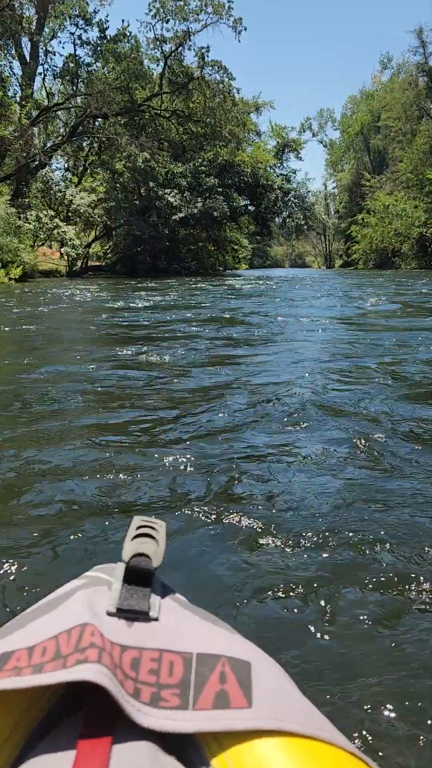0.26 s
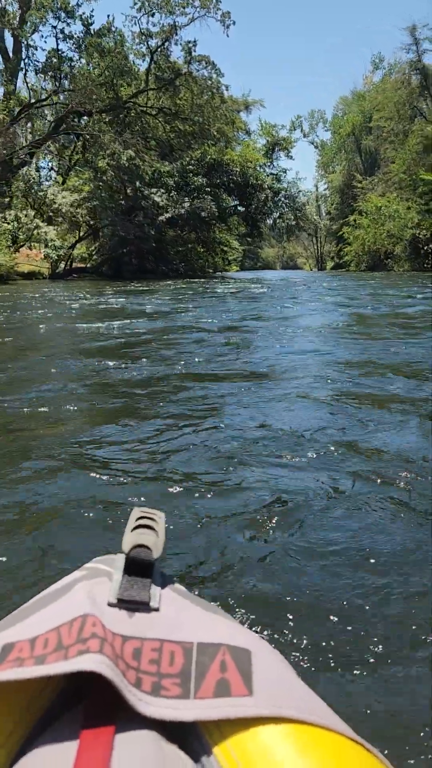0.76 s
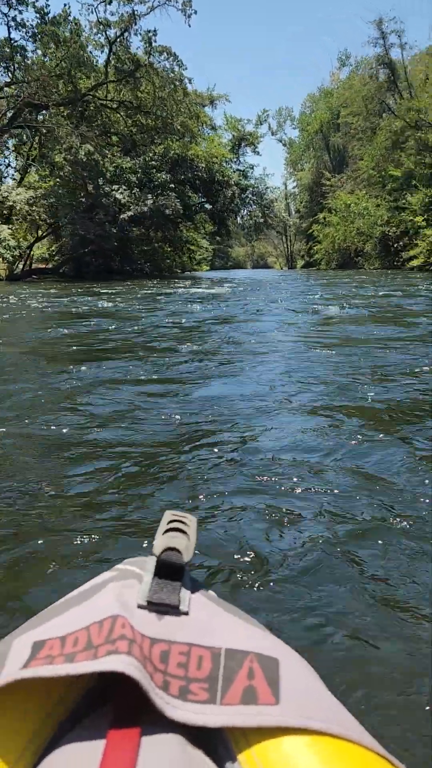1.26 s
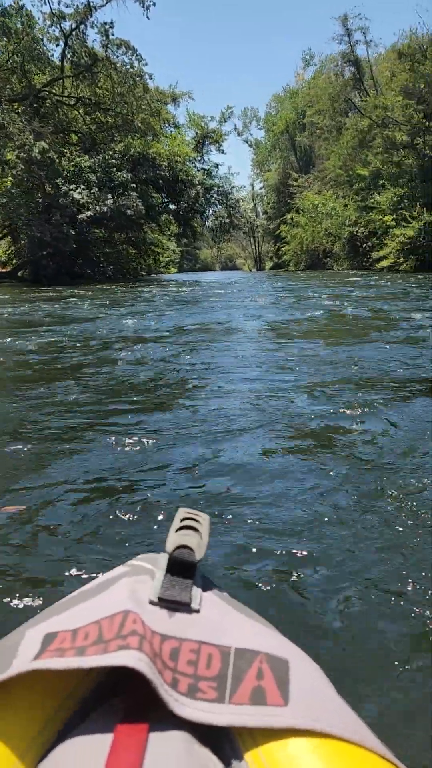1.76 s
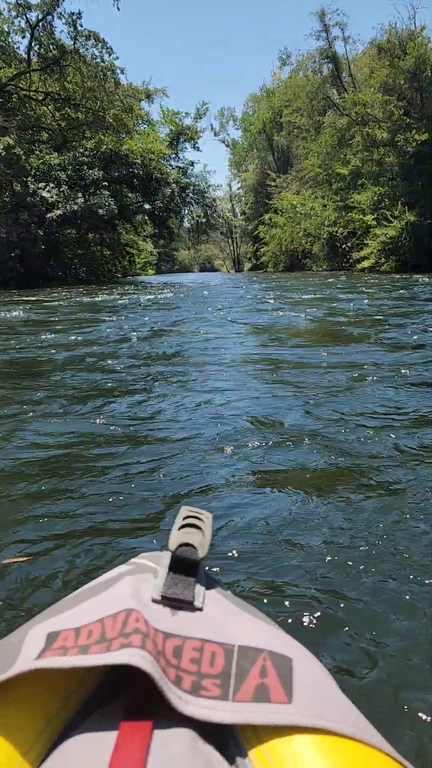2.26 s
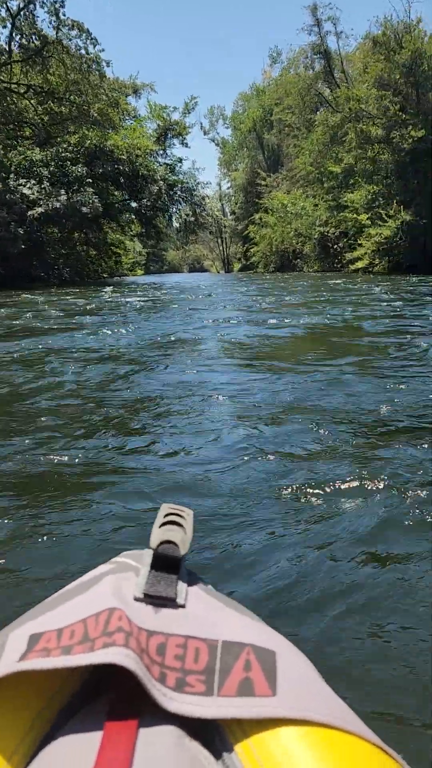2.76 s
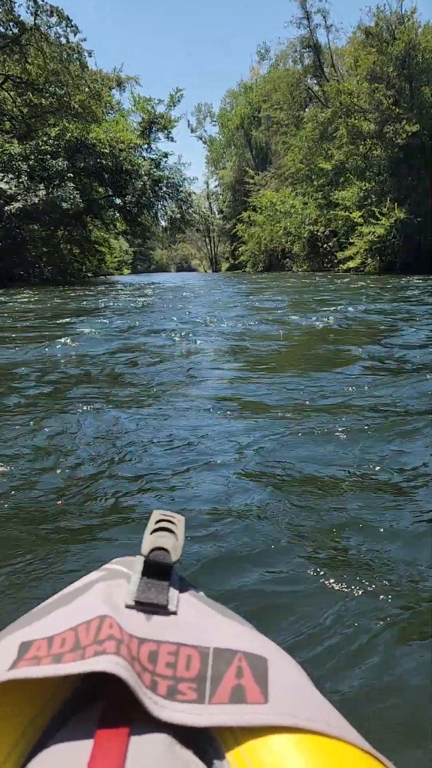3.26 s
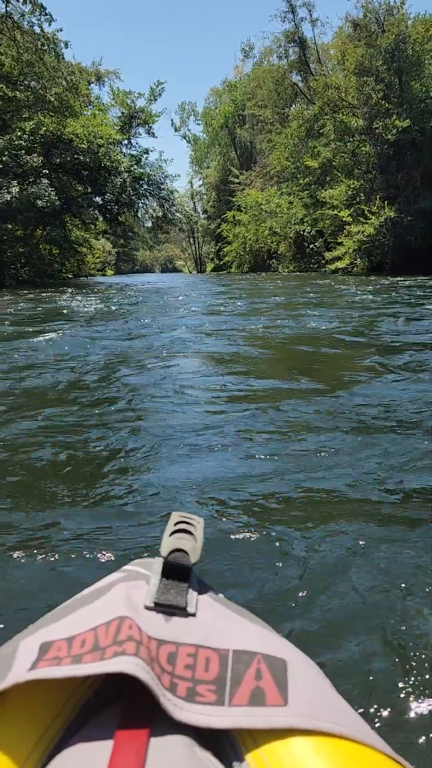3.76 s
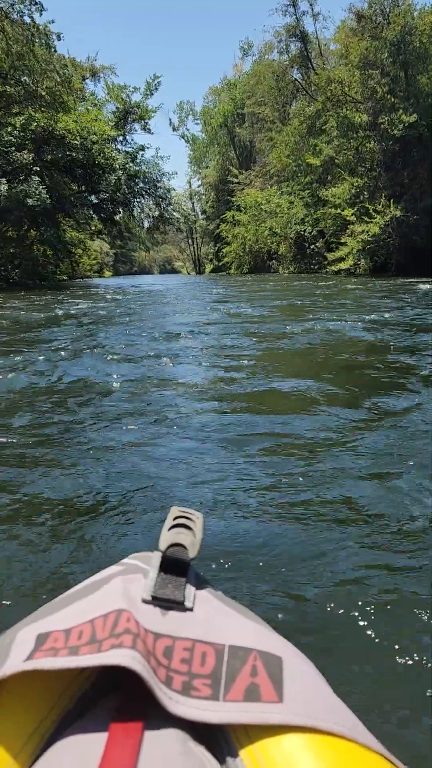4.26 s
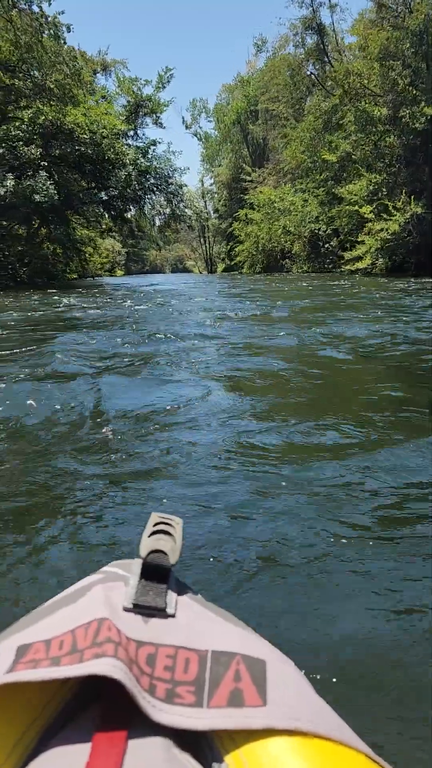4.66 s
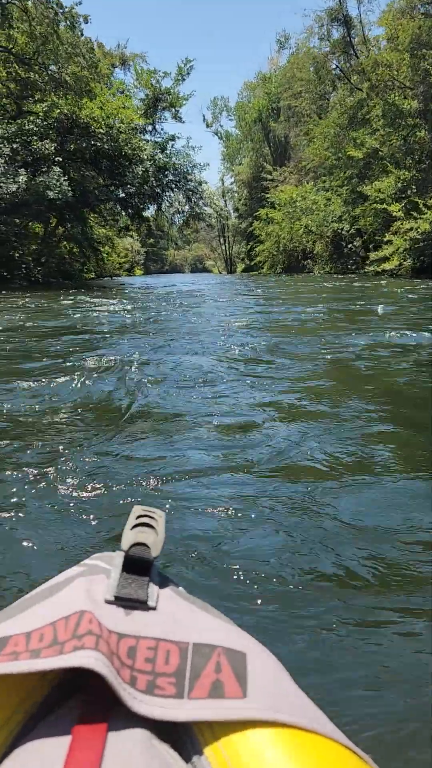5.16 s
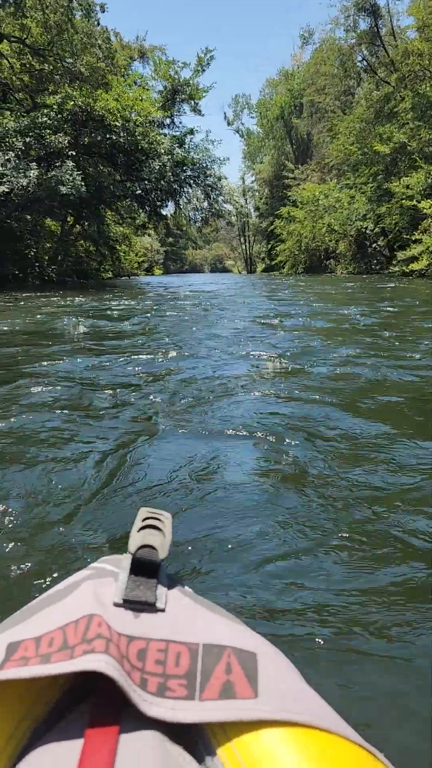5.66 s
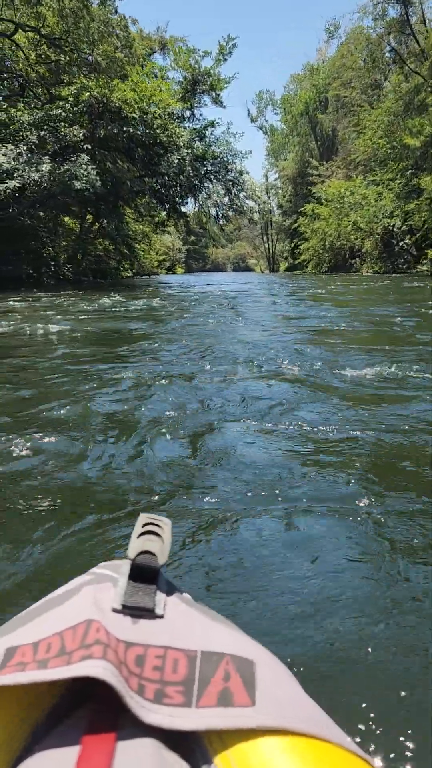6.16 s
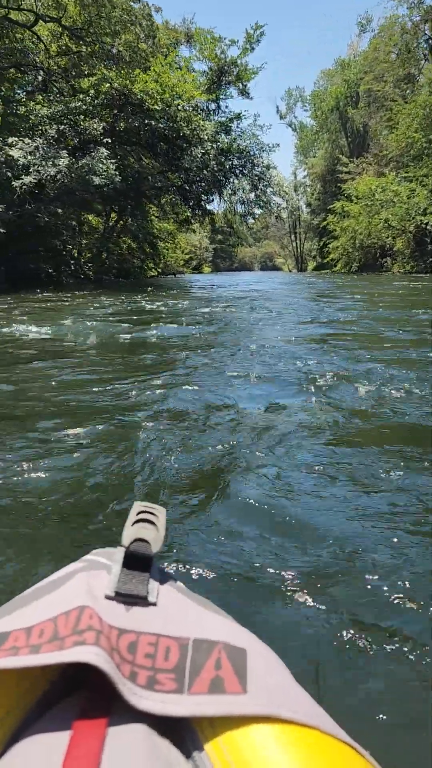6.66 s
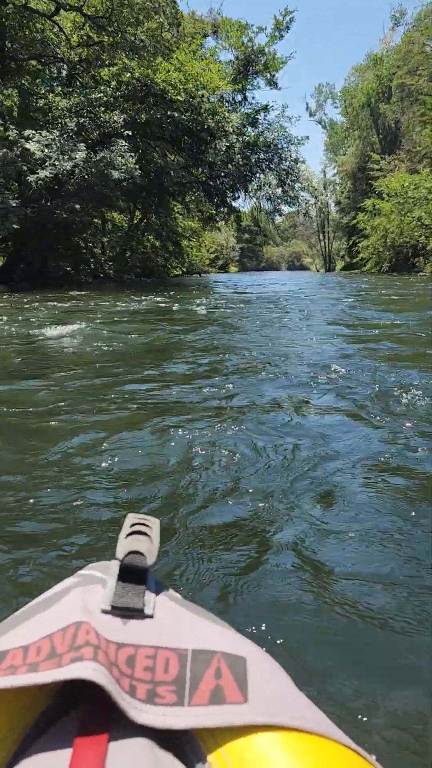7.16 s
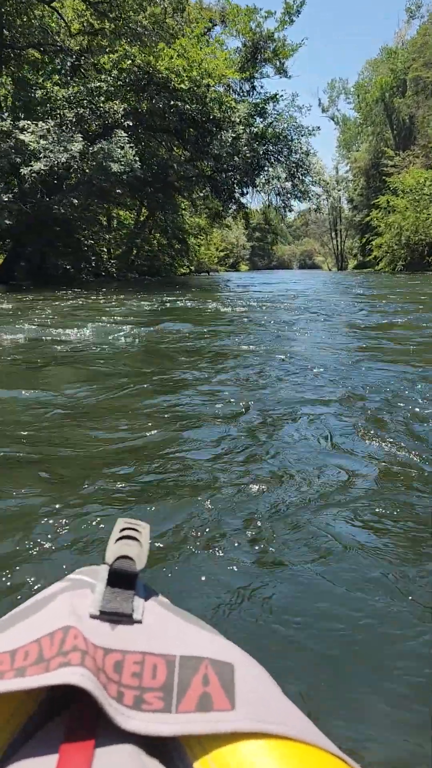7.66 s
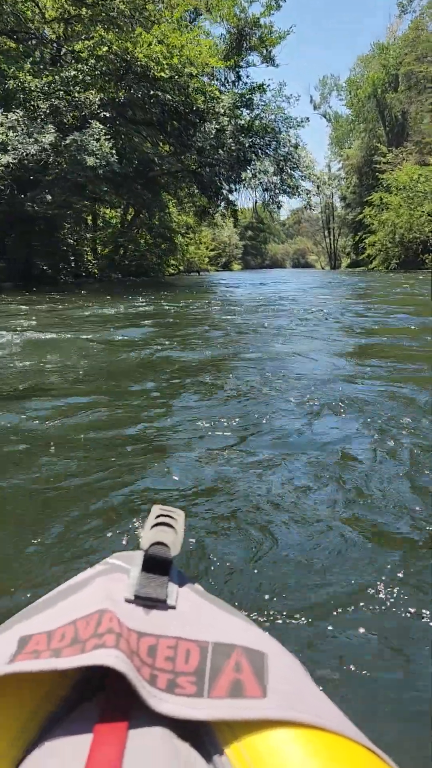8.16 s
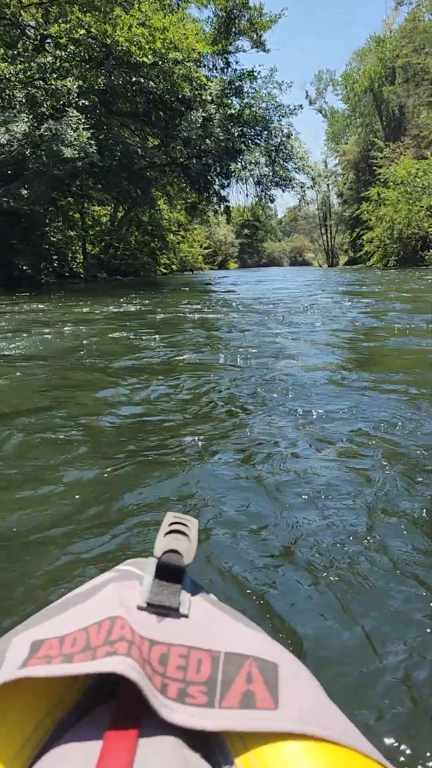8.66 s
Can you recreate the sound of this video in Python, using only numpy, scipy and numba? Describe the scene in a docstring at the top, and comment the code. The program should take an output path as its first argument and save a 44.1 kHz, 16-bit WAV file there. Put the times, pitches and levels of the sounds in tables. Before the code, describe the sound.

Close up on a flowing river, ripples gurgle and drops plop while irregular slaps and dull thumps knock against an air-filled boat.

```python
"""On a fast river, aboard a drifting inflatable kayak, with a phone as the microphone.
The current rushes all round as shaped noise with fizzing bubbles; ripples babble as clouds of dying sines.
Wavelets slap the bow in a dense crackle, and trapped air thuds under the soft hull as sagging pulses.
Spray patters back, drops plop, droplets tick close by and large single bubbles glide in pitch.
The phone's two ports stand close together and colour all this differently."""
import sys
import numpy as np
from scipy import signal
from scipy.fft import rfft, irfft, next_fast_len
from scipy.io import wavfile
from scipy.ndimage import uniform_filter1d
from numba import njit

SR = 44100
rng = np.random.default_rng(int(sys.argv[2]) if len(sys.argv) > 2 else 0)


def output_pcm(signal):
    """Save a mono or channel-first signal as 16-bit PCM at the path in sys.argv[1].

    Samples are clipped to [-1, 1] before scaling.
    """
    pcm = np.clip(np.atleast_2d(signal).T, -1, 1) * 32767
    wavfile.write(sys.argv[1], SR, np.round(pcm).astype(np.int16))


N = 393354
T = np.arange(N) / SR  # s
TOP_HZ = 15900  # the ports pass nothing much above this
PORT_LAG_S = 0.00024  # the longest travel time between the two ports

# Wavelets meeting the bow; each slaps, then the air it traps thuds. Levels are ahead of the layer gains:
# (time of the slap's peak [s], slap level [dB], slap rise [s], brightness relative to the slap [dB],
#  thud level [dB], thud pitch at its peak [Hz])
BOW_WAVES = [(.743, -25, 0.0052, -7.5, -24, 129), (1.302, -36.5, 0.049, -17, -18, 101),
             (1.368, -32, 0.013, -1, -21, 160), (1.398, -21.5, 0.012, -8.5, -13, 133),
             (1.429, -41, 0.017, -19, -18, 91), (1.459, -24.5, 0.015, -27, -27, 118),
             (1.752, -33.5, 0.013, -17, -19.5, 121), (1.871, -22.5, 0.0058, -7, -13.5, 89),
             (1.952, -22, 0.018, -9, -6, 96), (2.015, -22, .004, -6.5, -23, 144),
             (2.354, -30.5, 0.032, -11, -22, 116), (2.48, -22, 0.0079, -14, -16, 150),
             (2.756, -30, 0.013, -9, -36, 130), (3.2, -39, .014, -15, -27, 115),
             (3.768, -33, .012, -6, -15, 138), (4.385, -27, .016, -3.5, -20, 162),
             (4.417, -22.5, 0.014, -11.5, -19.5, 126), (4.446, -28.5, 0.012, -10, -17.5, 123),
             (4.621, -30, 0.0074, 4, -17, 145), (4.737, -29.5, 0.024, -5.5, -19, 120),
             (4.794, -31.5, 0.011, 4.5, -11, 120), (5.079, -34, 0.015, -16, -23.5, 102),
             (5.24, -31, .011, -1.5, -18, 118), (5.281, -33.5, .009, -18, -23, 102),
             (5.409, -26, 0.0035, -8.5, -16, 152), (5.484, -31.5, 0.013, -7, -20.5, 116),
             (5.578, -25.5, 0.0046, -8, -18.5, 171), (6.362, -30.5, .026, -4, -17.5, 104),
             (6.423, -29, 0.01, 3.5, -11.5, 130), (6.954, -26, 0.023, -6, -8.5, 123),
             (6.996, -19.5, 0.017, -11, -10.5, 122), (7.046, -27, 0.0039, 0, -7.5, 131),
             (7.666, -17.5, 0.008, -14, -13.5, 124), (7.721, -53, 0.011, -16, -20, 130),
             (8.157, -40, .012, -11, -26, 166), (8.515, -33, 0.0056, -13, -21.5, 100),
             (8.753, -37, 0.014, -17, -15.5, 128), (8.788, -34, 0.024, -12, -13, 133)]


def undb(db):
    """Decibels to gain."""
    return 10 ** (np.asarray(db) / 20)


def unit(x):
    """Scale to rms 1."""
    return x / np.sqrt(np.mean(x ** 2))


def walk(rate):
    """A randomly wandering level: values held for 1 / rate s, then smoothed twice; spread near 1."""
    hold = int(SR / rate)
    steps = np.repeat(rng.standard_normal(N // hold + 1), hold)
    return 1.3 * uniform_filter1d(uniform_filter1d(steps, hold), hold)[:N]


def colour(x, points, modes=(), size=4096):
    """Causal filter through (Hz, dB) points, plus bell-shaped resonances or dips (Hz, width Hz, dB)."""
    f = np.maximum(np.fft.rfftfreq(size, 1 / SR), 1)
    hz, db = np.transpose(points)
    curve = np.interp(np.log(f), np.log(hz), db)
    curve = curve + sum(d / (1 + (2 * (f - c) / w) ** 2) for c, w, d in modes)
    # folding the cepstrum forward in time gives the minimum-phase response
    cepstrum = irfft(np.log(undb(curve)))
    cepstrum[1:size // 2] *= 2
    cepstrum[size // 2 + 1:] = 0
    impulse = irfft(np.exp(rfft(cepstrum)))
    return signal.oaconvolve(np.atleast_2d(x), impulse[None], axes=1)[:, :N]


def split(x, hz):
    """The parts below and above a frequency."""
    low = signal.sosfiltfilt(signal.butter(2, hz, fs=SR, output="sos"), x)
    return low, x - low


def swell(s, rise, sharp=2):
    """An envelope starting rise s before its peak at s and dying more slowly: (first sample, envelope)."""
    age = np.arange(1, int(7 * rise * SR)) / (rise * SR)  # in rise times
    return int((s - rise) * SR), (age * np.exp(1 - age)) ** sharp


def add(track, start, sound):
    """Mix a sound in from a sample on."""
    start = max(start, 0)
    track[..., start:start + sound.shape[-1]] += sound[..., :N - start]


def swells(rows, sharp):
    """The joint envelope of swells given as (time of the peak [s], level [dB], rise [s])."""
    out = np.zeros(N)
    for s, db, rise in rows:
        start, envelope = swell(s, rise, sharp)
        add(out, start, undb(db) * envelope)
    return out


def wash():
    """White noise from all sides: two close ports hear it alike in the bass and unrelated in the treble."""
    mid, side = rfft(rng.standard_normal((2, next_fast_len(N))))
    alike = np.sinc(np.linspace(0, SR, len(mid)) * PORT_LAG_S) * undb(-.6)  # correlation at each frequency
    mid, side = mid * np.sqrt(1 + alike), side * np.sqrt(1 - alike)
    return unit(irfft([mid + side, mid - side])[:, :N])


@njit
def ring(start, hz, life, size, glide, skew):
    """Each bubble is a dying sine whose pitch glides; it reaches the ports with a phase difference."""
    out = np.zeros((2, N))  # start and life are in samples, glide is the pitch change over a life
    for k in range(len(start)):
        first = int(start[k])
        z, port = size[k] + 0j, np.exp(1j * skew[k])
        step = 2 * np.pi * hz[k] / SR
        turn = np.exp(1j * step - 5 / life[k])  # one sample's rotation and decay
        bend = np.exp(1j * step * glide[k] / life[k])
        for i in range(min(int(life[k]), N - first)):
            onset = min(i * step / 4, 1.)
            out[0, first + i] += onset * (z * port).imag
            out[1, first + i] += onset * (z / port).imag
            z, turn = z * turn, turn * bend
    return out


def froth(rate, lo_hz, hi_hz, cycles, spread_db, glide=0.35):
    """A cloud of bubbles from all sides, rate a second, many faint and a few strong; rms 1."""
    when, pitch, size, length, climb, side = rng.random((int(rate * N / SR), 6)).T
    hz = lo_hz * (min(hi_hz, TOP_HZ) / lo_hz) ** pitch
    life = cycles * (.5 + length) * SR / hz
    strength = undb(-spread_db * np.log(size + 1 / 200))
    skew = (2 * side - 1) * np.pi * hz * PORT_LAG_S
    return unit(ring(when * (N - 1), hz, life, strength, glide * (2 * climb - .5), skew))


def current(at):
    """Base levels of rush, hiss and eddies along the hull (dB) at the given times, before layer gains."""
    # the open river: (time [s], rush level [dB], hiss level [dB], eddy level [dB])
    river_levels = [(0.0, -35, -50, -40.5), (1.81, -37.5, -52.5, -41), (2.06, -35, -51, -34.5),
                    (3.5, -37.5, -53.5, -41.5), (4.65, -36.5, -52, -33.5), (5.96, -39, -57, -40.5),
                    (7.87, -38.5, -53.5, -37.5), (8.3, -39, -56.5, -38.5), (8.92, -40, -54, -39.5)]
    s, *columns = np.transpose(river_levels)
    return [np.interp(at, s, column) for column in columns]


def river():
    """Countless far bubbles merge into a rush that wavers band by band; nearer ones fizz through it."""
    # the rush's spectrum: (frequency [Hz], level [dB])
    rush_spectrum = [(25, 4), (38, 0.5), (56, 16.5), (85, 7.5), (125, 9), (200, -3.5), (270, 3), (380, -3),
                     (700, 3.5), (1500, 2), (4000, -1.5), (16000, -7.5)]
    level_db, hiss_db, eddy_db = current(T)
    low, rest = split(colour(wash(), rush_spectrum), 290)
    body, hiss = split(rest, 2900)
    low = unit(low) * undb(eddy_db + 0.17 + 1.0 * walk(26))
    body = body * undb(level_db + 9.0 + 0.71 * walk(14))
    hiss = hiss * undb(hiss_db + 22.5 + walk(24))
    fizz = froth(rate=700, lo_hz=2235, hi_hz=13460, cycles=38.5, spread_db=3.5) * undb(hiss_db + 14)
    return low + body + hiss + fizz


def ripples(floor_db=-44.5):
    """Small crests fold over, spit and babble; the largest air pockets glug against the hull."""
    # crests folding over beside the boat, ahead of the cloud gains: (time of the peak [s], level [dB], rise [s])
    crest_swells = [(.93, -38, .17), (1.42, -48, 0.072), (2.48, -59, 0.091), (3.2, -42, 0.12),
                    (3.8, -41.5, 0.089), (4.73, -37, 0.14), (6.63, -41.5, 0.033), (7.0, -32.5, 0.052),
                    (7.3, -40.5, 0.085), (7.69, -35, 0.14), (8.19, -38, 0.059)]
    level = np.hypot(undb(floor_db), swells(crest_swells, sharp=1.4))  # the floor: ripples that never stop
    spit = froth(rate=150, lo_hz=946, hi_hz=3900, cycles=7.2, spread_db=2.0) * undb(-3.0)
    babble = froth(rate=380, lo_hz=657, hi_hz=1986, cycles=21.5, spread_db=4.5, glide=0.2) * undb(-1.0)
    gurgle = froth(rate=90, lo_hz=301.6, hi_hz=866, cycles=19.3, spread_db=3.5, glide=0.36) * undb(-4.0)
    glug = froth(rate=40, lo_hz=108.3, hi_hz=171, cycles=7.0, spread_db=1.0, glide=0.076) * undb(-6.0)
    # sparse near bubbles
    plips = froth(rate=22, lo_hz=897, hi_hz=3630, cycles=45, spread_db=3.5, glide=0.25) * undb(-7.5)
    return level * (spit + babble + gurgle + glug + plips)


def pockets(scatter_db=1.5, scatter_octaves=0.36):
    """Air pockets under the hull (time s, level dB, pitch Hz): one a wave, its rebound, and chance lapping."""
    delay_cycles = 1.54  # a thud peaks this many of its own cycles after the slap
    struck = [(s + delay_cycles / hz, db, hz) for s, *_, db, hz in BOW_WAVES]
    # the hull springs back with a second thud: later, softer and lower
    rebound_s, rebound_db, rebound_pitch = 0.0359, -10, 0.75
    rebounds = [(s + rebound_s, db + rebound_db, hz * rebound_pitch) for s, db, hz in struck]
    # faint thuds at random times; their level is relative to the eddies
    laps_per_s, lap_db, lap_hz = 6.1, 3, 113
    when, size, pitch = rng.random((int(laps_per_s * N / SR), 3)).T
    when = when * T[-1]
    level_db = current(when)[2] + lap_db + scatter_db * (2 * size - 1)
    pitch_hz = lap_hz * 2 ** (scatter_octaves * (2 * pitch - 1))
    return struck + rebounds + list(zip(when, level_db, pitch_hz))


def thuds(rise_cycles=1.726, sag=0.075, wobble=0.11, width=0.31, churn_db=-12):
    """Trapped air pulses for a few cycles, sagging in pitch, and shakes the inflated tubes."""
    # how the soft hull favours or damps a thud: (frequency [Hz], width [Hz], level [dB])
    hull_resonances = [(61, 14, 2), (101, 35, -6), (150, 46, 1.5), (226, 55, -3)]
    out, shake = np.zeros((2, N)), np.zeros(N)
    drift = walk(130)
    for s, db, hz in pockets():
        start, envelope = swell(s, rise_cycles / hz, sharp=1.71)
        age = np.arange(len(envelope)) * hz / (rise_cycles * SR)  # in rise times
        wander = drift.take(start + np.arange(len(age)), mode="wrap")
        pitch = hz * np.exp(-sag * (age - 1) + wobble * wander)
        phase = 2 * np.pi * np.cumsum(pitch) / SR
        # each pocket sits somewhere else under the hull
        skew = width * rng.standard_normal() * np.array([[1], [-1]])
        add(out, start, undb(db) * envelope * np.sin(phase + skew))
        add(shake, start, undb(db) * envelope)
    churn_spectrum = [(20, -13), (55, 4.5), (90, -10.5), (170, 0.5), (300, -18.5), (900, -32.0), (4000, -73)]
    churn = unit(colour(wash(), churn_spectrum))
    return colour(out + undb(churn_db) * shake * churn, [(20, 0), (1000, 0)], hull_resonances)


def ticks(count=600, decay_s=.0014):
    """Droplets land close to the phone with a hard, bright tick: a quickly dying burst of noise."""
    # droplets ticking on the deck, ahead of the tick's colour: (time [s], level [dB])
    deck_ticks = [(.365, -14), (2.945, -23), (4.112, 0), (5.812, -17), (6.761, -14), (7.179, -14.5),
                  (8.105, -16), (8.155, -17)]
    out = np.zeros((2, N))
    decay = np.exp(-np.arange(count) / SR / decay_s)
    for s, db in deck_ticks:
        add(out, int(s * SR), undb(db) * rng.standard_normal((2, count)) * decay)
    return colour(out, [(500, -35), (2800, -14), (4200, 0.5), (8000, -1), (10500, 7), (14000, 9), (16000, -8)])


def spray(thrown_db=-18, thrown_rise_s=0.051):
    """Thrown water patters back in clumps: tiny ringing bubbles, a few hard pinpricks and a fine mist."""
    # showers falling back, ahead of the layer gains: (time of the peak [s], level [dB], rise [s])
    falling_water = [(.97, -45, 0.094), (2.14, -42.5, .1), (3.98, -50.5, 0.23), (5.03, -43, 0.086),
                     (6.64, -38, 0.083), (7.26, -44, 0.077), (7.7, -46, 0.29), (7.9, -36, 0.027),
                     (8.17, -53, 0.048)]
    # each slap throws its own spray, levelled from the slap's bright part
    thrown = [(s, db + bright_db + thrown_db, thrown_rise_s) for s, db, _, bright_db, *_ in BOW_WAVES]
    shower = swells(falling_water + thrown, sharp=1.65)
    patter = froth(rate=2200, lo_hz=3964, hi_hz=14140, cycles=40, spread_db=4.5, glide=0.04)
    plinks = froth(rate=170, lo_hz=2680, hi_hz=5080, cycles=47, spread_db=3.0, glide=.08)
    pricks = froth(rate=420, lo_hz=1380, hi_hz=8900, cycles=2.6, spread_db=4.5)
    mist = froth(rate=900, lo_hz=11500, hi_hz=15000, cycles=15, spread_db=4.0, glide=.03)
    clumps = undb(walk(60))
    return shower * clumps * (undb(10.5) * patter + undb(5.5) * plinks + undb(1.0) * pricks + undb(3.5) * mist)


def slaps():
    """A wavelet bursts on the bow in a dense crackle of short-lived bubbles."""
    # the slap's spectrum: (frequency [Hz], level [dB])
    splash_spectrum = [(100, -12.5), (200, 6), (380, 0), (700, -4.5), (1500, -5.5), (4000, 0.5), (8000, -7),
                       (16000, -15)]
    crackle = froth(rate=2600, lo_hz=198.6, hi_hz=11700, cycles=3.84, spread_db=1.5)
    crackle = unit(colour(crackle, [(200, -20), (10000, 6.0)]))  # small bubbles crack hardest
    swirl = rng.standard_normal((2, N))  # turbulence on each side of the hull is its own
    dull, bright = split(colour(crackle + undb(-1.5) * swirl, splash_spectrum), 1350)
    s, db, rise, bright_db, _, _ = np.transpose(BOW_WAVES)
    blow = swells(zip(s, db, rise), sharp=1.32)
    burst = swells(zip(s, db + bright_db, rise), sharp=2.25)
    fits = undb(2 * walk(240))  # the sheet tears in fits
    return undb(8.0) * (dull * blow + bright * burst * fits)


def drops(life_s=0.014, glide=0.053, splat_db=-5, splat_s=0.00052, count=600):
    """A drop splats on the surface and the bubble it traps rings briefly."""
    # the nearest drops plopping into the water: (time [s], ring level [dB], starting pitch [Hz])
    near_drops = [(0.836, -20.5, 1610), (.94, -18.5, 1560), (2.433, -20, 1680), (3.53, -18, 2600),
                  (4.047, -17.5, 3150), (4.303, -8, 6230), (4.336, -21, 1730), (4.38, -18, 1350),
                  (6.347, -24, 1630), (6.413, -11, 3320), (6.421, -9.5, 4360), (6.708, -10, 4350),
                  (6.867, -24, 4380), (7.062, -11, 2900), (7.178, -17, 2800), (7.244, -17, 4240),
                  (7.294, -23.5, 1470), (7.315, -17.5, 3180), (7.346, -26, 1550), (7.511, -17, 2600),
                  (7.632, -16.5, 1540), (7.986, -10.5, 4560), (8.101, -20, 1100), (8.188, -24.5, 1593)]
    s, db, hz = np.transpose(near_drops)
    skew = (rng.random(len(s)) - .5) * np.pi * hz * PORT_LAG_S
    life, climb = np.full(len(s), life_s * SR), np.full(len(s), glide)
    out = ring(s * SR, 1. * hz, life, undb(db), climb, skew)
    decay = np.exp(-np.arange(count) / SR / splat_s)
    for start, size in zip(s * SR, undb(db + splat_db)):
        add(out, int(start), size * rng.standard_normal((2, count)) * decay)
    return out


def bubbles(swelling=0.23, flutter_db=1.5):
    """Large bubbles glide up as they surface, or down as a cavity deepens; their tone flutters."""
    # large single bubbles, ahead of the flutter:
    # (time of the start [s], peak level [dB], starting pitch [Hz], end pitch [Hz], length [s])
    single_bubbles = [(1.029, -32.5, 466, 433, 0.043), (1.218, -32.5, 1044, 737, 0.071),
                      (1.436, -29.5, 1087, 1100, 0.072), (1.746, -27.5, 518, 860, .048),
                      (1.955, -16.5, 1690, 1800, 0.01), (2.136, -28, 1150, 1430, 0.02),
                      (2.326, -33, 400, 716, 0.035), (2.43, -29, 890, 600, 0.069),
                      (3.208, -31, 840, 1100, 0.049), (4.621, -27, 403, 440, 0.043),
                      (6.194, -29.5, 632, 560, 0.045), (6.233, -32, 655, 1300, .05),
                      (7.057, -19.5, 2020, 2100, 0.016), (7.189, -28.5, 1185, 2010, .032),
                      (7.718, -27, 848, 1090, 0.043), (7.769, -24, 850, 820, .022),
                      (7.85, -27, 786, 895, .028), (8.039, -25.5, 484, 420, 0.023)]
    out, flutter = np.zeros((2, N)), undb(flutter_db * walk(220))
    for s, db, hz, end_hz, length in single_bubbles:
        age = np.linspace(0, 1, int(length * SR))
        envelope = np.interp(age, [0, swelling, 1], [0, 1, 0])
        pitch = hz + (end_hz - hz) * age ** 1.38
        phase = 2 * np.pi * np.cumsum(pitch) / SR
        skew = (rng.random() - .5) * np.pi * hz * PORT_LAG_S * np.array([[1], [-1]])
        add(out, int(s * SR), undb(db) * envelope * np.sin(phase + skew))
    return out * flutter


def scene():
    """All the water round the boat."""
    return river() + ripples() + thuds() + slaps() + spray() + bubbles() + drops() + ticks()


def record(dry):
    """The right port is muffled and rings in the midrange; the left is more open. The top is cut."""
    # the ports' responses: (frequency [Hz], level [dB])
    left_response = [(60, 1), (130, 0.5), (175, 5.5), (250, -9.5), (380, -3), (1250, -1.5), (2100, 3.5),
                     (2850, -10), (4000, -10), (5300, -17), (7500, -12.5), (9400, -26.5), (13500, -29),
                     (16000, -32)]
    right_response = [(60, 0), (130, .5), (175, -6.5), (210, -1), (260, -4.5), (380, -2), (490, -6.5),
                      (700, -2), (1300, -4), (1750, -10), (2000, -10), (3800, -27.5), (8300, -24.5),
                      (9400, -38), (16000, -52)]
    # the ports' resonances and dips: (frequency [Hz], width [Hz], level [dB])
    left_resonances = [(347, 54, 3.5), (555, 52, 6), (1556, 170, 4.5), (4590, 1150, 5), (10500, 1100, 8.5),
                       (11360, 670, -15), (13300, 1200, 2.5)]
    right_resonances = [(388, 46, 7), (1432, 58, -7), (1559, 290, 14.5), (4560, 1020, 8.5)]
    # samples: holds the left port back, to keep step with the slower, muffled right port
    held_back = np.pad(dry[0], (7, 0))[:N]
    left = colour(held_back, left_response, left_resonances)
    right = colour(dry[1], right_response, right_resonances)
    top_cut = signal.ellip(8, .2, 70, TOP_HZ, fs=SR, output="sos")
    return signal.sosfilt(top_cut, np.vstack([left, right]))


dry = scene()
out = record(dry)
output_pcm(out)
```